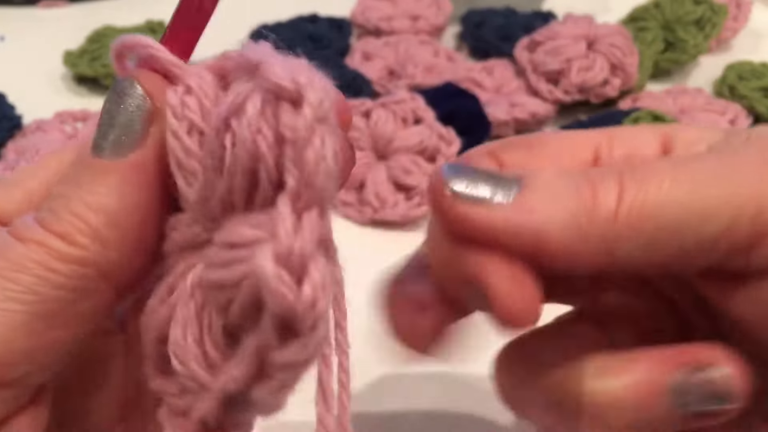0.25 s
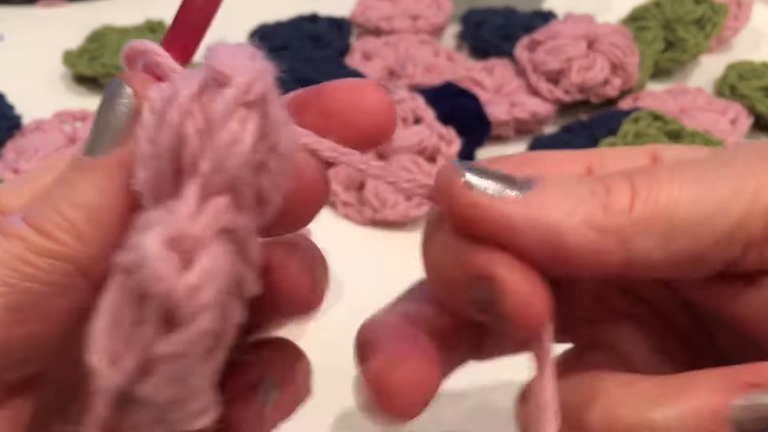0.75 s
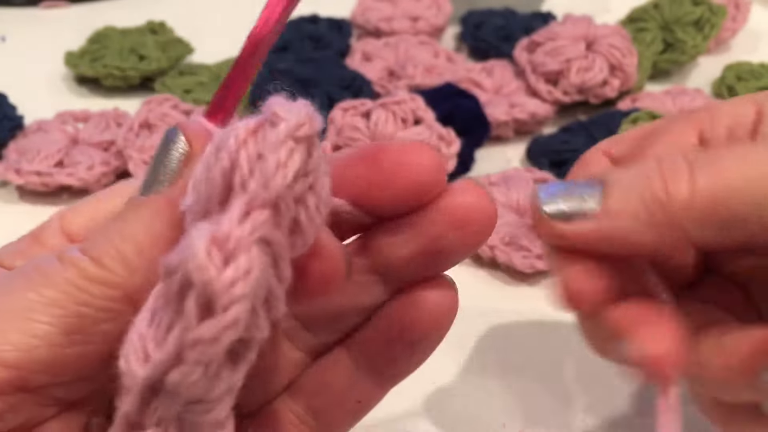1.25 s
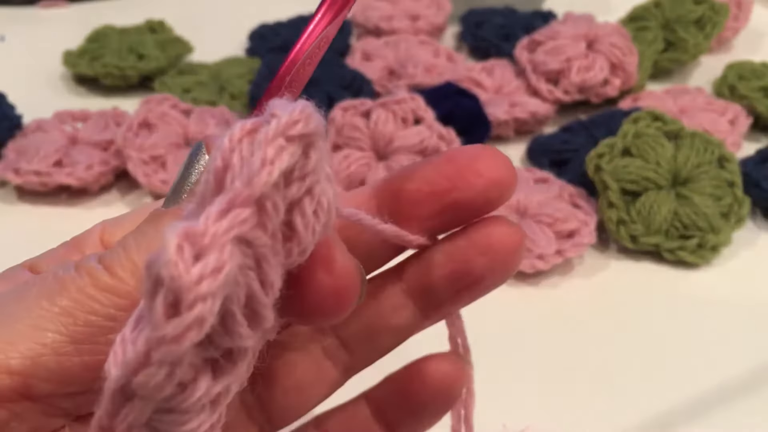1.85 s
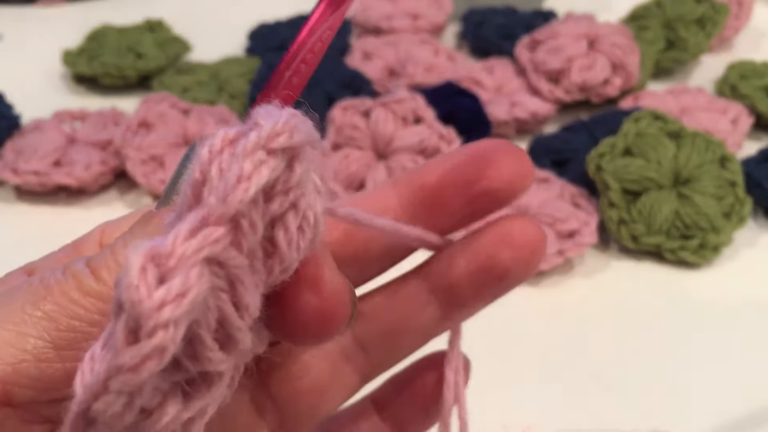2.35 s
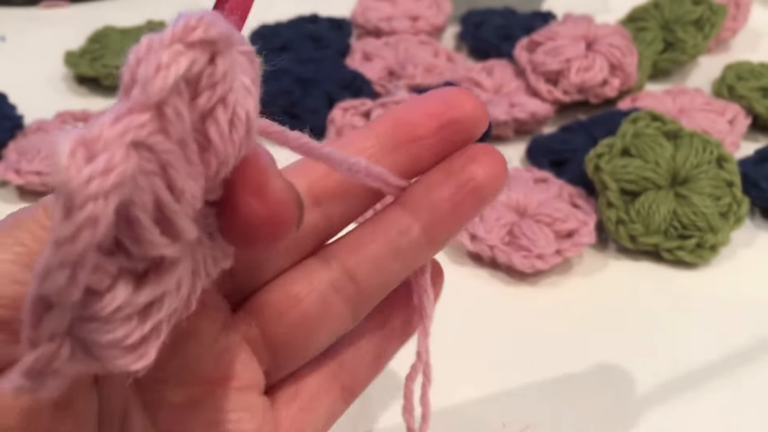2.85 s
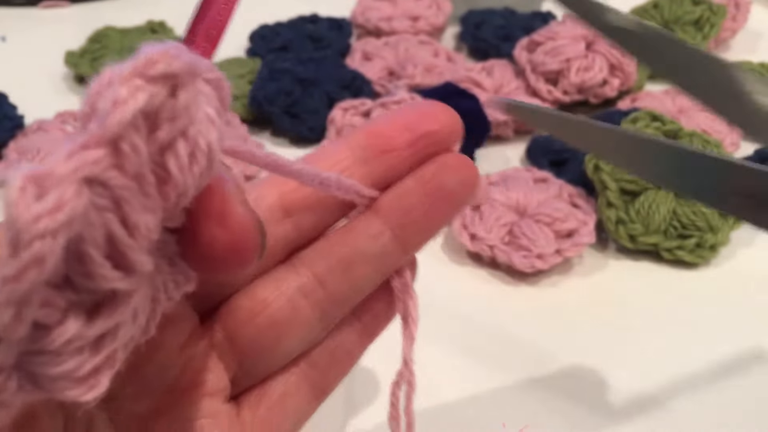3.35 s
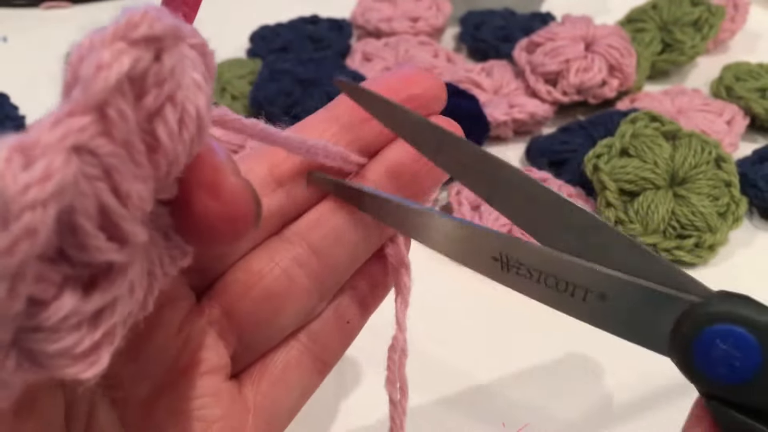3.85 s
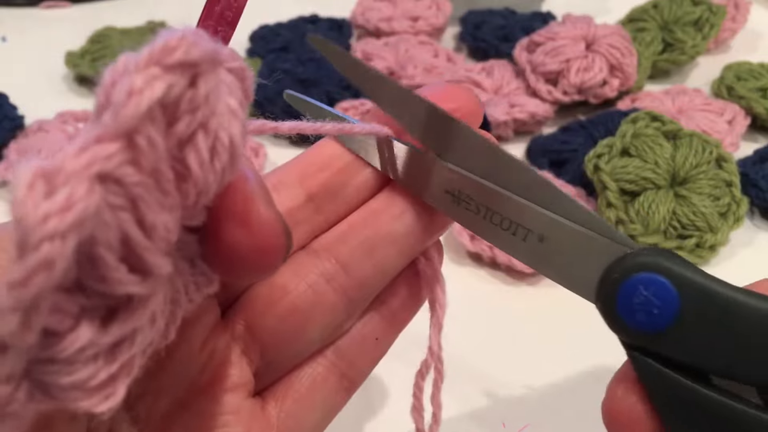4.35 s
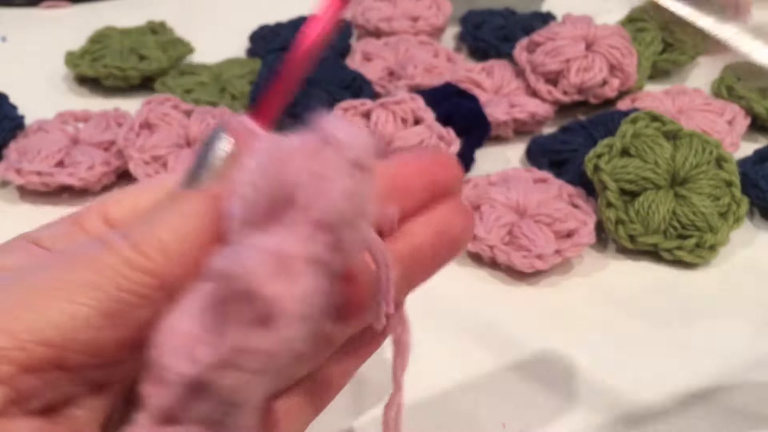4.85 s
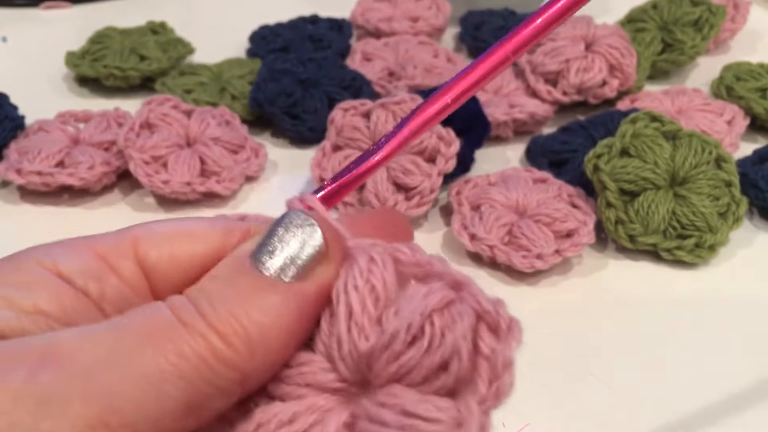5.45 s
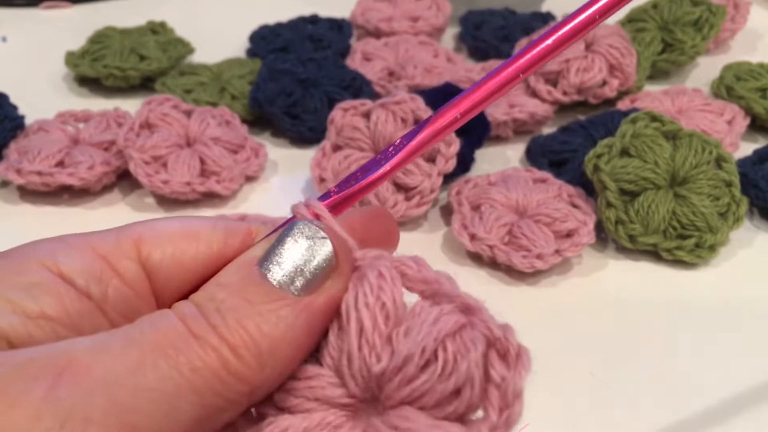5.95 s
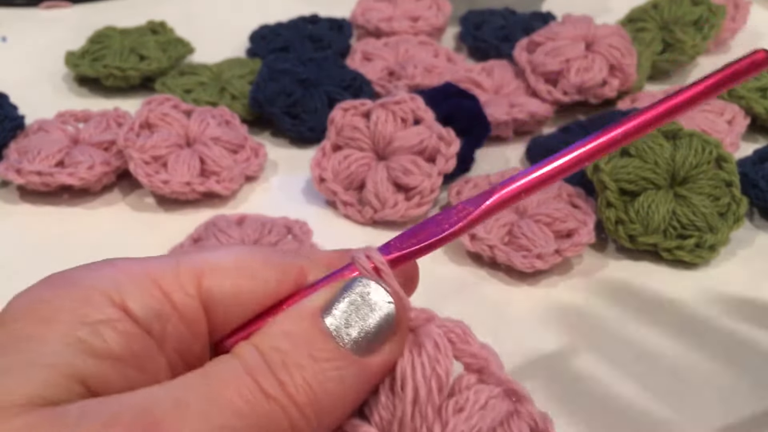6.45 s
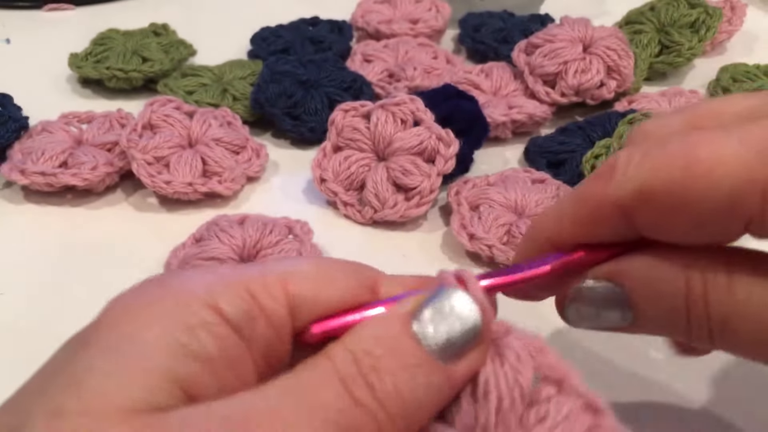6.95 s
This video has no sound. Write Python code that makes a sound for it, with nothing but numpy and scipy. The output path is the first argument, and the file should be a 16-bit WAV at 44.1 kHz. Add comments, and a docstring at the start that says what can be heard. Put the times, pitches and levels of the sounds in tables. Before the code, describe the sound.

Soft fibre rubbing close up, small table ticks, one crisp metallic scissor snip, and finally a heavy knocking clatter on a wooden tabletop indoors.

```python
"""First comes a soft brush of yarn drawn through the fingers, close to the microphone in a quiet room.
Fibre noise swells in pulls and tugs; scissors open, slide on the strand and snip it with ringing grinds of steel.
A little way off, hard things click, scuff and knock on wood: short bursts of chatter through resonances.
At the end something lands on the table with a clatter. The room answers briefly over its low rumble,
shaped from noise, and a faint mains hum made of sines."""
import sys
import numpy as np
from scipy import signal
from scipy.fft import rfft, irfft, next_fast_len
from scipy.io import wavfile
from scipy.ndimage import uniform_filter1d, map_coordinates

SR = 44100
rng = np.random.default_rng(int(sys.argv[2]) if len(sys.argv) > 2 else 0)


def persist_wave(psi):
    """Save psi, clipped to +-1, as 16-bit WAV."""
    counts = np.round(np.clip(psi, -1, 1) * 32767).astype(np.int16)
    wavfile.write(sys.argv[1], SR, np.atleast_2d(counts).T)


N = 317520
HIT_SIZE = SR // 2  # samples set aside for one short sound
HIT_T = np.arange(HIT_SIZE) / SR
TOP_HZ = 15900  # the recorder's band limit


# Yarn running steadily through the fingers, at the microphone: [start t/s, length/s, level/dB]
PULLS = [(.275, 0.073, -65.5), (0.547, 0.59, -68), (1.198, 0.292, -72), (1.503, 0.34, -80.5)]
PULL_ATTACK_S, PULL_RELEASE_S = 0.044, 0.035
# Quick tugs of the yarn past a fingertip: [peak t/s, level/dB, time to fall to 1/e either side/s, swish f/Hz]
TUGS = [(0.074, -68.5, .012, 8000), (0.149, -55.5, 0.027, 7350), (0.652, -59, 0.031, 3380),
        (0.99, -62.5, 0.069, 8500), (1.11, -62, 0.015, 8400), (1.161, -58.5, 0.022, 6000),
        (1.46, -66, .025, 1800), (7.088, -65.5, 0.028, 6800)]
# The strand sliding along the open blade
SLIDE_START_S, SLIDE_LENGTH_S, SLIDE_DB = 4.07, 0.42, -66.5
SLIDE_ATTACK_S, SLIDE_RELEASE_S = 0.075, 0.018
# Spectrum of fibres on skin: [f/Hz, relative level per Hz/dB]
FIBRES = [(710, -11), (1200, -9.5), (2200, -10.5), (2900, -6.5), (4400, -5), (6000, -2), (7300, -5.5),
          (8800, -3), (10500, -10.5), (13000, -10), (15800, -15)]
# Spectrum of fibres on steel: [f/Hz, relative level per Hz/dB]
STEEL = [(880, -36), (1500, -11), (1670, -6), (2080, -2), (2310, -12), (3170, -2.5), (3570, -3), (6320, -6),
         (7180, 4.5), (8250, -8), (9280, 2), (10400, -11), (12800, -9.5), (15800, -20.5)]


def handling():
    """Yarn rubs through the fingers in steady pulls and quick tugs, and later along a blade."""
    t = np.arange(N) / SR
    pulls = sum(amp(db) * stroke(s, length, PULL_ATTACK_S, PULL_RELEASE_S) for s, length, db in PULLS)
    fingers = rub(FIBRES, grain_db=2.0, patchy_db=3.5)
    fingertip = rub(FIBRES, grain_db=2.5, patchy_db=1.5)
    tugs = np.zeros(N)
    for s, db, width, hz in TUGS:
        tugs += amp(db) * np.exp(-np.abs((t - s) / width)) * swish(fingertip, hz)
    slide = amp(SLIDE_DB) * stroke(SLIDE_START_S, SLIDE_LENGTH_S, SLIDE_ATTACK_S, SLIDE_RELEASE_S)
    blade = rub(STEEL, grain_db=3.0, patchy_db=2.0)
    return pulls * fingers + tugs + slide * blade


def rub(spectrum, grain_db, patchy_db):
    """Countless fibres catch and let go: noise with a fast and a slower random flutter, then coloured."""
    flutter_db = grain_db * wobble(900) + 1.1 * wobble(45)
    catches = rng.standard_normal(N) * amp(flutter_db)
    return unit(filtered(patchy(catches, patchy_db), lambda f: amp(along(spectrum, f))))


def patchy(x, depth_db, size=512):
    """The colour wanders: patches a few hundred Hz wide swell and fade."""
    z = signal.stft(x, nperseg=size)[2]
    across_hz = uniform_filter1d(rng.standard_normal(z.shape), size=7, axis=0)
    field = uniform_filter1d(across_hz, size=24, axis=1)  # smooth in time as well
    return signal.istft(z * amp(depth_db * unit(field)), nperseg=size)[1][:len(x)]


def stroke(start, length, attack, release):
    """A movement gathers speed, holds it and stops, as straight ramps of gain."""
    t = np.arange(N) / SR - start
    return np.clip(t / attack, 0, 1) * np.clip(1 - (t - length) / release, 0, 1)


def swish(x, hz):
    """Each tug hisses a little more in one band, lifted by a resonant peak."""
    peak = signal.lfilter(*signal.iirpeak(hz, 4, fs=SR), x)
    return unit(x + amp(0.5) * peak)


# The strand parts ply after ply between the blades
CUT_START_S, PLY_GAP_S = 4.5935, 0.0112
PLY_DB, PLY_SWELL_DB, PLY_TREBLE_DB = -53, 7, 0.5  # first ply, extra at the thick middle, brightness
PLY_RISE_S, PLY_FALL_S = 0.01424, 0.026


def plies(count=6):
    """Small catches as the plies part one after another, strongest in the middle of the strand."""
    rows = []
    for k in range(count):
        level_db = PLY_DB + PLY_SWELL_DB * np.sin(np.pi * k / count)
        rows.append((CUT_START_S + k * PLY_GAP_S, level_db, PLY_TREBLE_DB, 0, PLY_RISE_S, PLY_FALL_S))
    return rows


# The blades catching on each other: [peak t/s, level/dB, treble/dB, ring/dB, 60 dB rise/s, 60 dB fall/s]
SNIPS = [(3.2387, -35, -7.5, 2.5, .026, 0.063), (3.283, -58, -15, -21, 0.12, 0.024),
         (4.627, -35, -1.5, -3.5, .04, 0.019), (4.658, -34.5, -1.5, 0, 0.018, 0.028),
         (4.6625, -15, 2.5, 4, .01, .013), (4.776, -62.5, -4, -14, 0.14, 0.096),
         (6.897, -52.5, 3.5, -0.5, .0039, .02)]
# Steel squeaks at the pivot: [peak t/s, f/Hz, level/dB, time to fall to 1/e either side/s]
SQUEAKS = [(3.2775, 12480, -55.5, 0.0061), (3.28, 10800, -69, .002), (3.308, 9300, -58.5, 0.01),
           (3.316, 7400, -67, .005), (4.46, 12600, -67.5, 0.02), (4.478, 934, -70.5, 0.027),
           (4.489, 4760, -71, 0.0087)]
# Resonances of the blades wide open: [f/Hz, width/Hz, level/dB]
OPEN_BLADES = [(910, 170, -16), (2340, 90, -2), (3160, 170, -23), (3805, 230, 9), (4100, 170, 5.5),
               (4400, 280, 1), (5170, 340, -2), (5600, 270, -3), (6500, 730, -1), (8400, 700, 0),
               (12200, 790, -3), (13700, 1900, 0.5)]
# Resonances of the blades biting into the strand: [f/Hz, width/Hz, level/dB]
HALF_CLOSED = [(2110, 120, -11.5), (2720, 170, -10), (3600, 200, -7.5), (4750, 350, -11), (6100, 900, -7),
               (7800, 400, 1), (9100, 500, -4.5), (11300, 700, -4), (12800, 860, -2)]
# Resonances of the blades shut: [f/Hz, width/Hz, level/dB]
BLADES = [(2509, 130, -17), (3780, 120, -4), (3991, 200, -3), (4470, 170, 5), (4400, 380, -2.5),
          (5200, 410, -10), (5935, 230, -11), (7160, 360, -7), (8880, 310, -6.5), (9860, 400, -3.5),
          (11650, 210, 2), (11540, 170, -4.5), (12550, 250, -12.5), (12400, 200, -4.5), (13900, 470, -10.5)]


def scissors():
    """Edge grinds on edge, swelling to a snap; the resonances shift in steps as the blades close."""
    out = np.zeros(N)
    lead = 0.05  # s kept before each peak for the swell
    closing_s, closed_s = 4, 4.6605
    t = HIT_T - lead
    for s, db, treble_db, ring_db, rise, fall in SNIPS + plies():
        modes = OPEN_BLADES if s < closing_s else HALF_CLOSED if s < closed_s else BLADES
        grind = chatter(amp(-60 * np.maximum(-t / rise, t / fall)))
        ring = amp(ring_db) * unit(resonate(grind, modes))
        rasp = amp(-4.5) * unit(band(grind, (7500, 14500), order=2))
        rasp += amp(-16.0) * unit(band(grind, (700, 6000), order=1))
        snap = filtered(ring + rasp, lambda f: amp(along([(4500, 0.01), (9000, treble_db)], f)))
        handles = amp(-28.0) * unit(band(grind, (200, 600), order=2))  # the plastic grips answer dully
        direct = unit(near_echoes(snap + handles, echo_db=-21, span=.003))  # off the hand and the blades
        # the room gets a broader sound than the microphone does directly
        spread = unit(direct + amp(-1) * unit(band(grind, (2800, 14500), order=2)))
        reflections = in_room(spread, wet_db=-22.0) - spread
        add(out, s - lead, amp(db) * burst(direct + reflections, (rise + fall) / 10))
    for s, hz, db, width in SQUEAKS:
        drift = np.cumsum(rng.normal(0, .12, HIT_SIZE))  # stick-slip is never quite steady
        tone = np.sqrt(2) * np.sin(2 * np.pi * hz * t + drift)
        squeak = amp(db) * np.exp(-(t / width) ** 4) * tone
        add(out, s - lead, in_room(squeak, wet_db=-14))
    return out


# Knocks on wood, a little way off:
# [t/s, level/dB before tilt, tilt/dB per octave, chatter t60/s, rise time constant/s, treble edge f/Hz]
KNOCKS = [(2.298, -51, -2.5, .021, 0.0011, 10000), (2.3032, -39.5, 0.03, .02, 0.001, 15500),
          (2.319, -49, 0.5, .017, 0.0027, 15000), (5.875, -33.5, 2.5, 0.016, .0008, 7000),
          (6.0722, -33, 5, .008, .0005, 8820), (6.7273, -26.5, 3.5, .015, .0006, 8500),
          (6.748, -32.5, 1, .019, 0.0042, 8500), (6.770, -28, -2, 0.015, 0.0014, 8500),
          (6.7798, -30.5, -1, 0.015, .00064, 12000), (6.7938, -27.5, -1.5, 0.02, .001, 7000),
          (6.8028, -35, -6, .01, .0012, 11000)]
# Resonances of the knocked wood: [f/Hz, width/Hz, level/dB]
WOOD = [(371, 34, -10.5), (604, 41, -8.5), (888, 130, -6), (1027, 49, 4), (1298, 180, 2), (1830, 250, 2),
        (2160, 99, -1), (2554, 41, -4), (3085, 170, -2.5), (3560, 250, 1), (5200, 2100, -19),
        (6070, 860, -2.5), (8920, 920, -23.5)]


def wooden_knocks():
    """Hard things strike wood, chatter and ring its resonances."""
    return contacts(KNOCKS, WOOD, hold=.0025, touch=0.4, rattle_db=-2.0, wet_db=-9.5)


# A small hard thing ticking and rebounding, a little way off:
# [t/s, level/dB before tilt, tilt/dB per octave, chatter t60/s, rise time constant/s, treble edge f/Hz]
CLICKS = [(2.5405, -33, 1.5, 0.0074, 0.00018, 12800), (2.555, -48, 6, .021, .00016, 11000),
          (5.6705, -38, 3, 0.018, 0.00034, 11500), (5.6825, -43, 1.5, 0.015, 0.00019, 8560)]
# Resonances of the small hard thing: [f/Hz, width/Hz, level/dB]
CLICKER = [(262, 18, -3.5), (396, 77, -3.5), (583, 70, 2), (1320, 43, 5.5), (1430, 110, -4), (1920, 62, -5),
           (2150, 100, -7.5), (3120, 106, 5), (4160, 140, 0), (4700, 260, -4.5), (6050, 580, -3.5),
           (7330, 660, -3), (9120, 370, -11), (13250, 1800, -10)]


def clicks():
    """A small hard thing ticks and rebounds, with a strong first touch and a very fast rise."""
    return contacts(CLICKS, CLICKER, hold=0.00073, touch=0.78, rattle_db=-7.5, wet_db=-9.5)


# Brief scuffs on the wood, a little way off:
# [t/s, level/dB before tilt, tilt/dB per octave, chatter t60/s, rise time constant/s, treble edge f/Hz]
SCUFFS = [(.344, -62, -2.5, .044, .0023, 11000), (2.0, -67.5, -0.5, 0.043, .005, 15600),
          (2.445, -58, -2.5, 0.022, .012, 12000), (2.454, -50.5, 0, 0.032, .0063, 14100),
          (4.478, -70, -0.5, .05, .008, 15500), (6.0505, -55, -1.5, .06, .001, 4490)]
# Resonances of a scuffed spot: [f/Hz, width/Hz, level/dB]
SCUFFED = [(230, 140, 3.5), (337.4, 50, -1), (636, 24, -0.5), (844, 44, -3), (1590, 57, 1),
           (1950, 230, -3.5), (2600, 210, -8.5), (3300, 230, -2), (4900, 240, -13.5), (5950, 330, -6.5),
           (9000, 900, -10)]


def scuffs():
    """Something scuffs the wood: a softer rise and hardly any first touch."""
    return contacts(SCUFFS, SCUFFED, hold=0.00083, touch=0.022, rattle_db=-9, wet_db=-8.5)


# Bands in which a contact's levels are set: [low f/Hz, high f/Hz]
BANDS = [(100, 700), (700, 2400), (2400, 5000), (5000, 15500)]


def contacts(rows, modes, hold, touch, rattle_db, wet_db):
    """A hard contact cracks, chatters for milliseconds and rings the body; its hardness sets the colour."""
    out = np.zeros(N)
    for s, level_db, tilt_db, chatter_t60, rise, edge_hz in rows:
        levels = contact_levels(level_db, tilt_db, edge_hz)
        # the faces buzz together for the hold time in s, then part
        dying = amp(-60 * np.maximum(HIT_T - hold, 0) / chatter_t60)
        force = chatter(dying * (1 - np.exp(-HIT_T / rise)))
        force[0] += touch * np.linalg.norm(force)  # the first touch
        body = unit(resonate(force, modes)) + amp(rattle_db) * unit(force)
        body = lowpass(body, edge_hz, order=4)  # softer contacts lack the top
        hit = sum(amp(db) * burst(band(body, edges), 0.003) for db, edges in zip(levels, BANDS))
        add(out, s, in_room(near_echoes(hit, echo_db=-19.5, span=.02), wet_db))
    return out


def contact_levels(db, tilt_db, edge_hz):
    """A contact's level in each band: a tilt about the body's band, with less crack when it is soft."""
    centres_hz = np.sqrt(np.prod(BANDS, axis=1))
    levels = db + tilt_db * np.log2(centres_hz / 1300)
    crack_db = 17.5 * np.log2(edge_hz / TOP_HZ)  # 17.5 dB lost per octave of lowered treble edge
    return levels + np.array([0, 1.9, 0, crack_db])  # the body's band stands out a little


# Soft, heavy blows on the table top: [t/s, boom level/dB before trim, thud level/dB before trim, hardness f/Hz]
THUMPS = [(0.345, -46.5, -47, 238), (0.373, -49, -50, 199), (2.307, -50.5, -31, 1500),
          (2.321, -58, -36, 700), (2.5442, -43, -39.5, 398), (6.081, -44, -31.5, 2000),
          (6.118, -41, -38.5, 702), (6.739, -24.5, -27.5, 300), (6.7579, -36.5, -14.5, 1800),
          (6.7695, -24.5, -11, 1197), (6.7949, -30.5, -14, 1793), (6.802, -33.5, -12, 1002),
          (6.829, -37.5, -23, 900), (6.867, -47, -32.5, 1403), (6.894, -47, -28.5, 600)]
BOOM_TRIM_DB, THUD_TRIM_DB = -3.5, -7.5
# Resonances of the table top: [f/Hz, width/Hz, level/dB]
TABLE_TOP = [(53.6, 11, -5.5), (84, 9, 0), (156.9, 4.5, -4), (267, 21, -5), (379, 35, -4), (406, 22, 1.5),
             (443.5, 15, -3), (534, 22, 4.5), (584, 28, 1.5), (681.6, 14, -5), (776, 21, -8), (894, 25, -8),
             (986, 32, -2), (1080, 40, 0), (1595, 140, -9), (1860, 160, -2)]


def thumps():
    """Heavy blows bend the whole table top: a deep boom under a hollow thud, duller for softer blows."""
    out = np.zeros(N)
    for s, boom_db, thud_db, hardness_hz in THUMPS:
        force = chatter(amp(-60 * HIT_T / .016))
        force[0] += .9 * np.linalg.norm(force)  # the main push
        force = lowpass(force, hardness_hz, order=2)
        top = unit(resonate(force, TABLE_TOP)) + amp(-7) * unit(force)
        boom = amp(boom_db + BOOM_TRIM_DB) * burst(band(top, (42, 190)), 0.0098)
        thud = amp(thud_db + THUD_TRIM_DB) * burst(band(top, (225, 2100)), .009)
        add(out, s, in_room(boom + thud, wet_db=-13))
    return out


# Spectrum of the room's rumble and hiss: [f/Hz, relative level per Hz/dB]
AIR = [(12, -32.5), (20, -14), (49, 0.5), (90, -7.5), (123, -2), (149, -15.5), (227, -11.5), (261, -16.5),
       (355, -16.5), (496, -26), (996, -29), (1320, -33.5), (2060, -33.5), (2880, -36), (15800, -41.5)]
# Mains hum: [f/Hz, peak level/dB before lift]
HUM = [(119.6, -71), (239.2, -79.5)]
HUM_LIFT_DB = 4.5


def background():
    """Room rumble and faint hiss are shaped noise; the mains hum is sines that waver in level together."""
    air = unit(filtered(rng.standard_normal(N), lambda f: amp(along(AIR, f))))
    t = np.arange(N) / SR
    hum = sum(amp(db + HUM_LIFT_DB) * np.sin(2 * np.pi * hz * t) for hz, db in HUM)
    return amp(-61.5) * air + hum * amp(1.5 * wobble(2.6))


# Reverberation time of the room: [f/Hz, t60/s]
ROOM_T60 = [(100, .42), (500, 0.23), (1400, 0.19), (3700, 0.23), (9000, 0.32), (15000, 0.039)]
# Colour of the reflections: [f/Hz, relative level/dB]
ROOM_GAIN = [(60, -5.5), (230, 3.5), (450, -0.5), (1000, 5.5), (3500, -3), (8000, -6), (15000, 0)]


def in_room(x, wet_db):
    """A sound and its reflections, a tail of noise in which each frequency dies at its own speed."""
    hz, t, z = signal.stft(rng.standard_normal(HIT_SIZE), SR, nperseg=256)
    fade = amp(along(ROOM_GAIN, hz)[:, None] - 60 * t / along(ROOM_T60, hz)[:, None])
    tail = signal.istft(z * fade, SR, nperseg=256)[1][:HIT_SIZE]
    tail = tail * (1 - np.exp(-(HIT_T / 0.0044) ** 2))  # reflections build up over milliseconds
    return x + amp(wet_db) * signal.fftconvolve(x, tail / np.linalg.norm(tail))[:HIT_SIZE]


def near_echoes(x, echo_db, span, count=5):
    """Nearby surfaces return a few weak copies that notch the spectrum."""
    out = x.copy()
    for delay, sign in zip(rng.uniform(span / 10, span, count), rng.choice([-1, 1], count)):
        lag = max(round(delay * SR), 1)
        out[lag:] += sign * amp(echo_db) * x[:-lag]
    return out


def chatter(envelope):
    """A short rush of micro-impacts: noise evened in spectrum between two shapings by the envelope."""
    x = rng.standard_normal(HIT_SIZE) * envelope
    even = irfft(np.exp(1j * np.angle(rfft(x))), HIT_SIZE)
    return unit(even * np.sqrt(envelope))


def resonate(x, modes):
    """x through a body's damped resonances, alternating in sign."""
    def response(f):
        total = 0
        for k, (centre, width, db) in enumerate(modes):
            damping = 1j * f * width
            total = total + (-1) ** k * amp(db) * damping / (centre * centre - f * f + damping)
        return total
    return filtered(x, response)


def filtered(x, response):
    """x times a complex response of frequency."""
    size = next_fast_len(len(x) + SR // 4)
    return irfft(rfft(x, size) * response(np.fft.rfftfreq(size, 1 / SR)), size)[:len(x)]


def band(x, edges, order=3):
    """Causal band-pass."""
    return signal.sosfilt(signal.butter(order, edges, "bandpass", fs=SR, output="sos"), x)


def lowpass(x, hz, order):
    """Causal low-pass."""
    return signal.sosfilt(signal.butter(order, hz, fs=SR, output="sos"), x)


def wobble(rate):
    """A smooth random curve, rate knots a second."""
    knots = rng.standard_normal(int(N * rate / SR) + 4)
    return map_coordinates(knots, [np.arange(N) * rate / SR])


def along(points, hz):
    """Interpolate (f/Hz, value) points on a log frequency axis."""
    f, v = np.transpose(points)
    return np.interp(np.log(hz + 1), np.log(f + 1), v)


def amp(db):
    """Decibels to gain."""
    return 10 ** (np.asarray(db) / 20)


def unit(x):
    """Scale to rms 1."""
    return x / np.sqrt(np.mean(x ** 2) + 1e-20)


def burst(x, seconds):
    """Scale to the energy of rms 1 held for a short time."""
    return x / np.sqrt(np.sum(x ** 2) / (seconds * SR) + 1e-20)


def add(track, s, x):
    """Mix x into the track at s seconds."""
    start = max(round(s * SR), 0)
    track[start:start + len(x)] += x[:N - start]


def scene():
    """Everything at one microphone, from the yarn close by to the room behind."""
    close = handling() + scissors()
    farther = wooden_knocks() + clicks() + scuffs() + thumps()
    return (close + farther + background())[None]


# Response of the microphone: [f/Hz, level/dB]
MICROPHONE = [(25, -4), (45, 0.5), (14000, -0.5), (15300, -2.5), (15900, -8.5)]


def record(dry):
    """The microphone's treble droops; the recorder keeps nothing above its band limit."""
    return np.array([filtered(x, lambda f: amp(along(MICROPHONE, f)) * (f < TOP_HZ)) for x in dry])


dry = scene()
out = record(dry)
persist_wave(out)
```